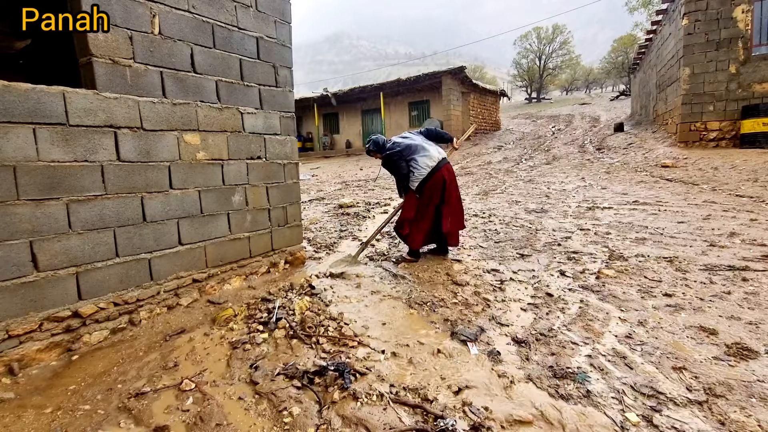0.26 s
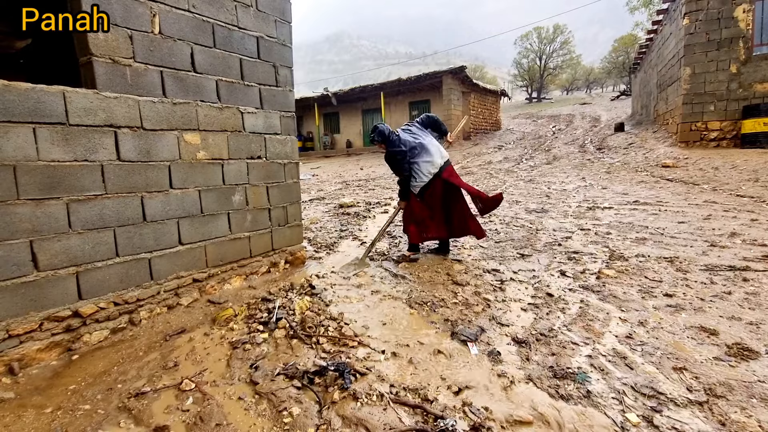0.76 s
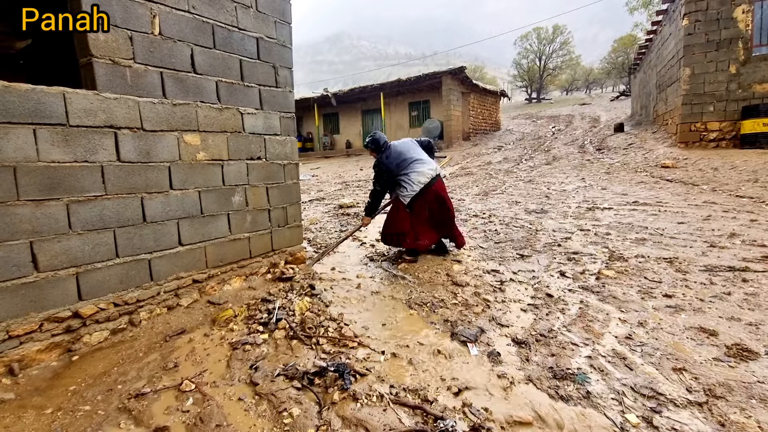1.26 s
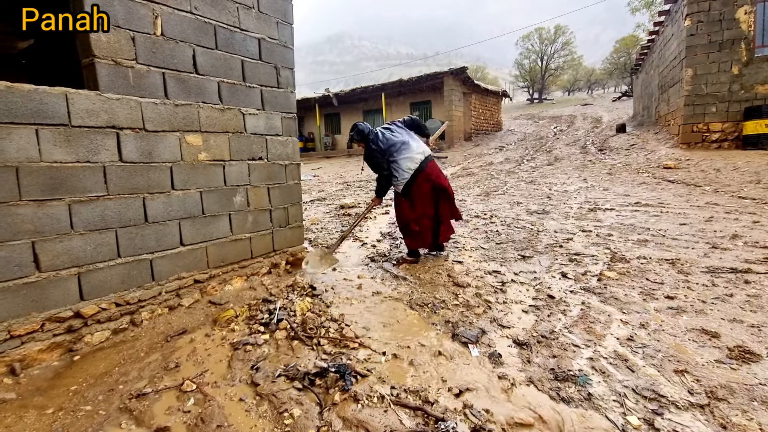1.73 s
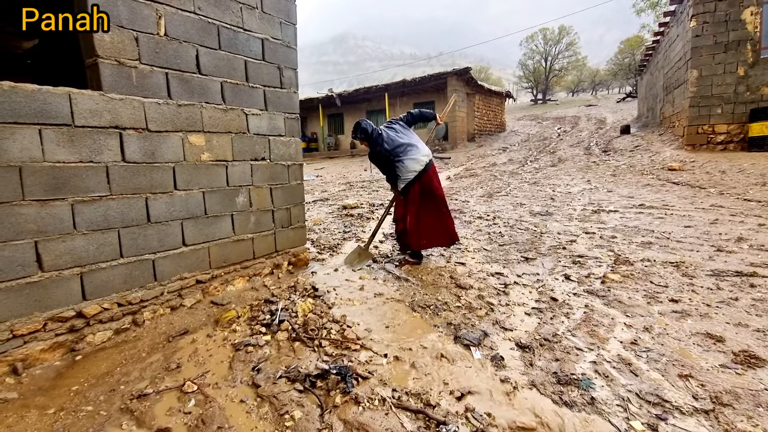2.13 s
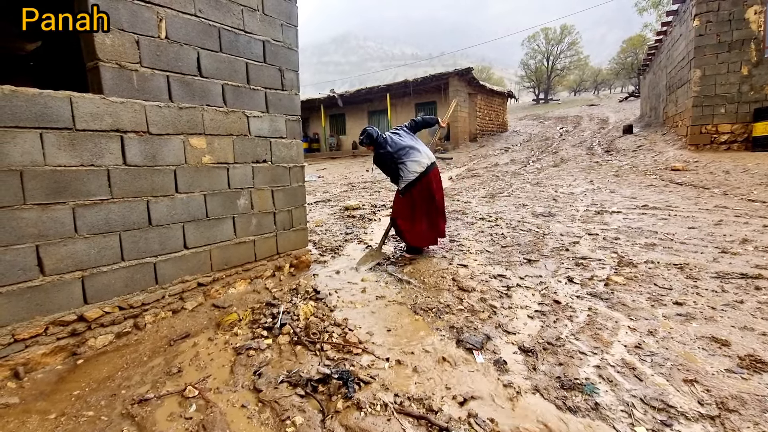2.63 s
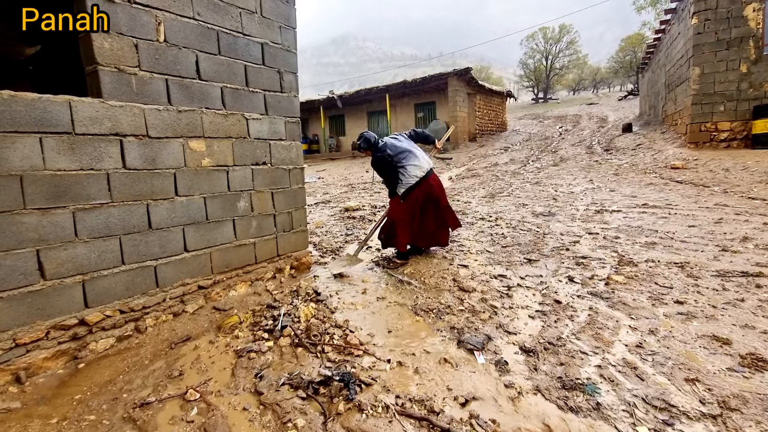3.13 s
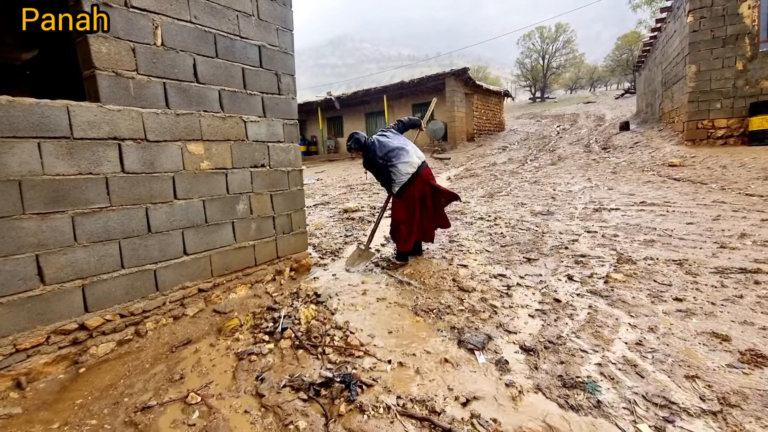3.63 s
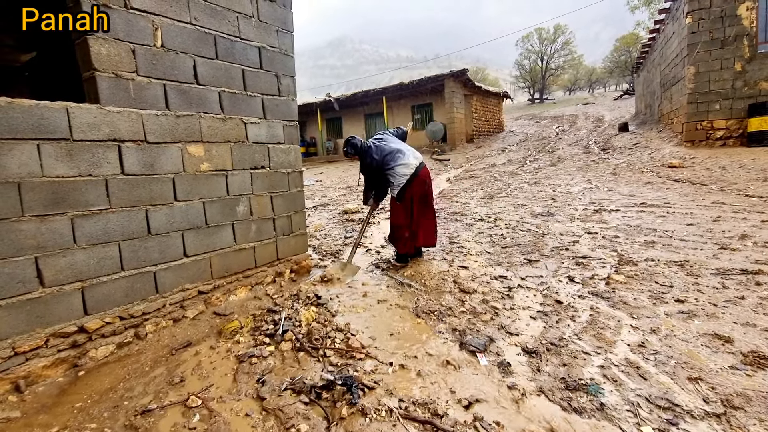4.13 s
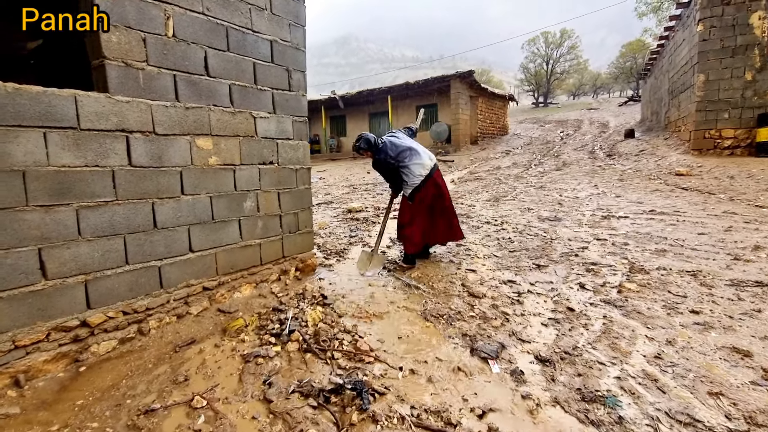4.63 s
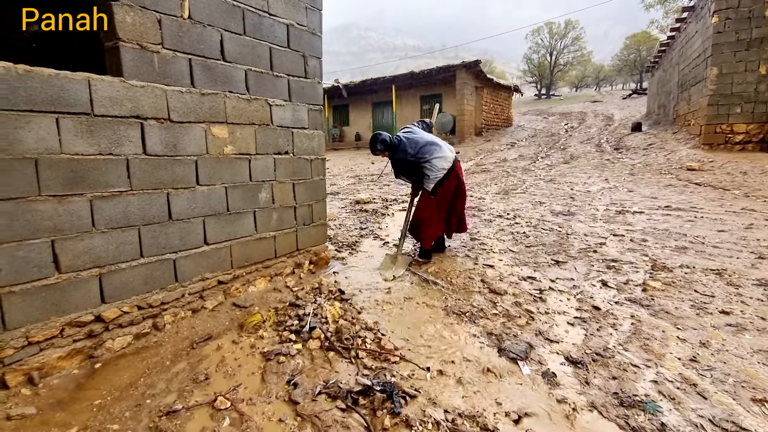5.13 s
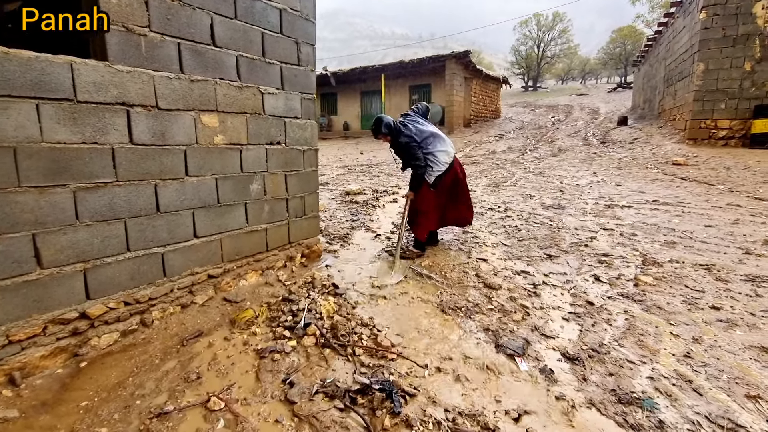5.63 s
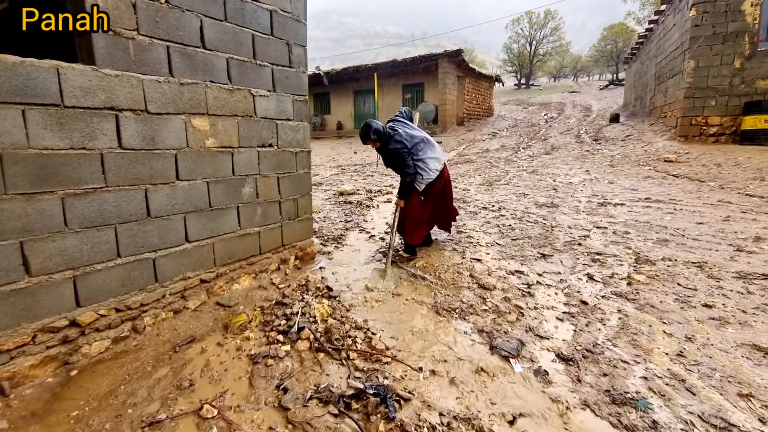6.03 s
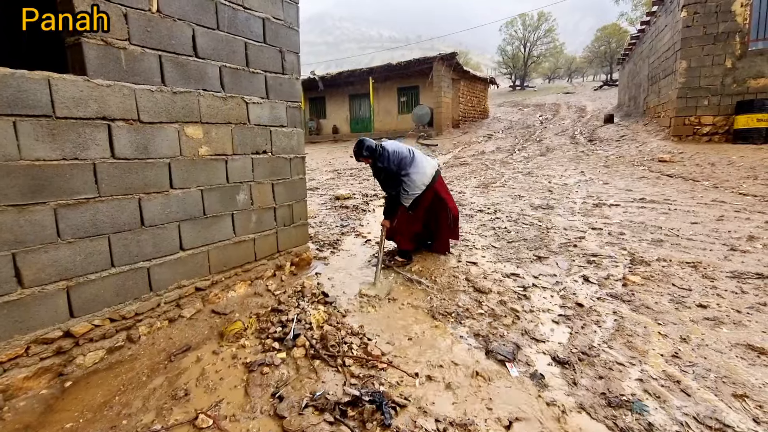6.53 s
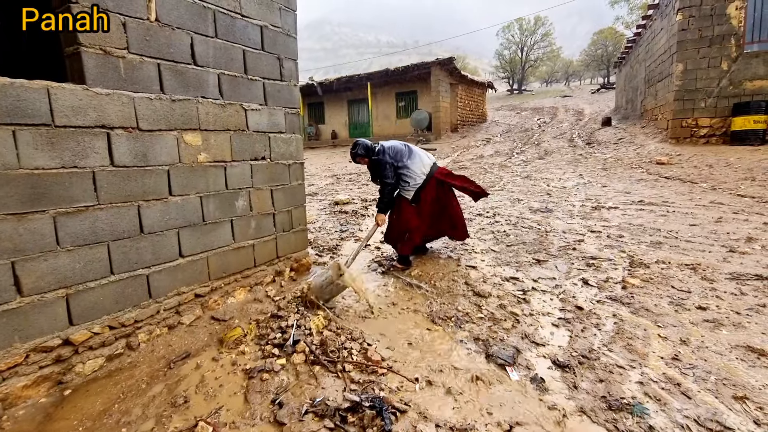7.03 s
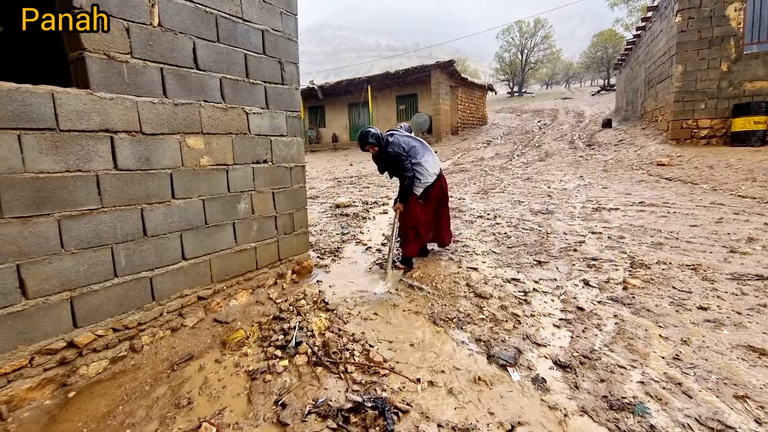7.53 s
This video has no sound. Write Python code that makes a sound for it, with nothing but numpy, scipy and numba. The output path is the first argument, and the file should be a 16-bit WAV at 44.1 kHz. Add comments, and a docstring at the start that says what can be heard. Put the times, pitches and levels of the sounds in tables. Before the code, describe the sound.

Close to a wall in a muddy yard, a shovel slaps, scrapes and pushes wet mud in uneven bursts, bubbly and sucking with a brief steely edge. The thickest churning comes around one second and again near four, with sparser slops between. Thin trickling and drizzle hiss continue beneath, sparrows chirp faintly slightly to the right, and gusts rumble directly on the stereo microphone.

```python
"""Shovelling wet mud beside a wall

A shovel slaps and pushes mud along a ditch: torn noise and bubbles excite steel blade resonances.
Air pockets sing as decaying sines; water is a crowd of small rings over hiss, with single ticking drops.
Sparrows, a little stronger on the right, are gliding near-sine tones; walls and ground add a noise tail.
Gusty wind is low noise with lumpy levels and a few thumps, acting directly on two microphone ports.
"""
import sys
import numpy as np
from scipy import signal
from scipy.fft import rfft, irfft, next_fast_len
from scipy.io import wavfile
from scipy.ndimage import uniform_filter1d, map_coordinates
from numba import njit

SR = 44100
rng = np.random.default_rng(int(sys.argv[2]) if len(sys.argv) > 2 else 0)


def digitize_waveform(pressure):
    """Quantize a signal to 16-bit integers and store it at the path in sys.argv[1].

    Rows of a 2-D input are taken as channels; values are limited to [-1, 1].
    """
    field = np.atleast_2d(pressure).T
    bounded = np.clip(field, -1, 1)
    quanta = np.round(bounded * 32767).astype(np.int16)
    wavfile.write(sys.argv[1], SR, quanta)


N = 342524  # samples
MID_SIDE = np.array([[1], [-1]])  # sign of the side signal at the left and right ports


def undb(db):
    """Decibel law: amplitude gain of a level in dB."""
    return 10 ** (np.asarray(db) / 20)


def unit(x):
    """Normalization: scales a signal to rms 1."""
    return x / np.sqrt(np.mean(x ** 2))


def curve(table):
    """Linear interpolation: columns of a time table, one value a sample."""
    s, *columns = np.transpose(table)
    return [np.interp(np.arange(N) / SR, s, column) for column in columns]


def colour(x, points, lo_hz=1, hi_hz=30000):
    """Linear filtering: weights the spectrum by (f/Hz, gain/dB) points between two soft edges."""
    size = next_fast_len(N)
    f = np.arange(size // 2 + 1) * SR / size + 1e-3
    hz, db = np.transpose(points)
    edges = 1 / np.sqrt((1 + (lo_hz / f) ** 8) * (1 + (f / hi_hz) ** 8))
    gain = undb(np.interp(np.log(f), np.log(np.maximum(hz, 1)), db)) * edges
    return irfft(rfft(x, size) * gain, size)[..., :N]


def walk(rate):
    """Random modulation: levels held 1 / rate s, smoothed twice, with rms 1."""
    k = max(int(SR / rate), 2)
    held = np.repeat(rng.standard_normal(N // k + 1), k)
    return unit(uniform_filter1d(uniform_filter1d(held, k), k)[:N])


def lumpy(points, edges_hz, lumps_db, rate):
    """Band-limited noise: each band fluctuates in level independently."""
    out = 0
    for lo, hi in zip(edges_hz, edges_hz[1:]):
        lumps = undb(lumps_db * walk(rate))
        out = out + lumps * colour(rng.standard_normal(N), points, lo, hi)
    return unit(out)


@njit
def ring(start, hz, turns, size, glide, length):
    """Damped oscillation: grains swell, decay by 1/e in `turns` cycles and rise in pitch."""
    out = np.zeros(length)
    for g in range(len(start)):
        step, fade = 2 * np.pi * hz[g] / SR, np.exp(-hz[g] / (turns[g] * SR))
        phase, a = 0., size[g]
        for i in range(start[g], min(length, start[g] + int(5 * turns[g] * SR / hz[g]))):
            phase += step
            step *= 1 + glide * (1 - fade)
            a *= fade
            out[i] += a * np.sin(phase) * min(phase / (3 * turns[g]), 1.)
    return out


def grains(s, hz, turns, db, glide):
    """Superposition: sums damped oscillations at times s, limited to audible pitches."""
    s, hz, turns, db = np.broadcast_arrays(s, hz, turns, db)
    start = (np.clip(s.ravel(), 0, N / SR) * SR).astype(np.int64)
    pitch = np.clip(hz.ravel(), 30., 15000.)
    return ring(start, pitch, 1. * turns.ravel(), undb(db.ravel()), float(glide), N)


# trickling water and drizzle: t/s, relative gurgle level/dB, relative patter level/dB
FLOW = [(0.0, -43.5, -49), (0.91, -41.5, -50.5), (3.42, -45.5, -50), (4.13, -37.5, -45.5),
        (4.91, -39.5, -47), (7.77, -36.5, -45)]


def trickle(swell_db, count=7000):
    """Bubble resonance: small bubbles and drops ring at random times, as loud as the flow."""
    gurgle_db, patter_db = curve(FLOW)
    where, size, pitch, lasting = rng.random((count, 4)).T
    at = (where * (N - 1)).astype(int)
    hz = 600 * 25 ** pitch
    flow_db = np.where(hz < 3500, gurgle_db[at] - 8, patter_db[at] + 2 - hz / 1100)
    flow_db = flow_db + 2 * swell_db[at]
    # a few grains are much louder than the rest; longer ones are softer
    db = flow_db - 5 * lasting ** 3 - 4.38 * np.log(size + 0.0044)
    return grains(where * N / SR, hz, 1.33 + 11 * lasting ** 3, db, glide=0.082)


def spatter(count=600):
    """Impulse response: each near drop kicks up the drizzle gain, which decays by 1/e in 3 ms."""
    where, size = rng.random(count), np.minimum(rng.exponential(1, count), 3.5)
    kicks = np.zeros(N)
    np.add.at(kicks, (where * N).astype(int), 0.7 * size)
    return 1 + signal.lfilter([1], [1, -np.exp(-1 / (0.003 * SR))], kicks)


# noise spectrum of far water: f/Hz, relative density level/dB
WATER_SPECTRUM = [(290, -13), (500, -4.5), (1040, -2), (1550, -10), (2500, -1.5), (3740, -7), (9370, -22.5),
                  (15500, -21)]


def wash(swell_db):
    """Incoherent sum: far water blurs to patchy hiss, drizzle to steadier hiss nearly unalike at the ports."""
    gurgle_db, patter_db = curve(FLOW)
    water = (463, 820, 1400, 1610, 2300, 3040), gurgle_db - 7.5 + swell_db, .8, 3.5
    drizzle = (4370, 5170, 10500, 20100), patter_db - 4.5 + 20 * np.log10(spatter()), .95, 1.2
    out = 0
    for edges_hz, db, apart, lumps_db in (water, drizzle):
        mid, side = (lumpy(WATER_SPECTRUM, edges_hz, lumps_db, rate=30) for _ in range(2))
        out = out + (mid + apart * side * MID_SIDE) * undb(db)
    return out


# wind on the ports: t/s, relative buffeting level/dB, relative rush level/dB
GUSTS = [(0.0, -31, -34.5), (1.1, -31.5, -32.5), (1.43, -36.5, -36), (2.01, -25, -33), (2.08, -36, -33),
         (3.53, -34, -40.5), (3.96, -31.5, -34), (5.43, -36.5, -39.5), (5.91, -30.5, -35.5),
         (6.36, -33, -34.5), (6.51, -20, -31), (6.53, -34.5, -34.5), (6.77, -28, -32.5), (6.83, -40, -41),
         (7.05, -28.5, -37.5), (7.77, -43, -43.5)]
# wind noise spectrum: f/Hz, relative density level/dB
WIND_SPECTRUM = [(12, -48), (20, -29.5), (75, -6), (120, -13), (289, -12), (645, -19.5), (800, -47),
                 (1760, -120)]


def wind():
    """Turbulent pressure: eddies push both ports partly alike, in lumps of limited size."""
    buffet_db, rush_db = curve(GUSTS)
    out = 0
    for lo_hz, hi_hz, db, lumps_db, rate in ((20, 133.6, buffet_db, 4.9, 26), (153, 473, rush_db, 2.26, 25)):
        mid, side = rng.standard_normal((2, N))
        # the two ports agree more as the pitch rises
        side = colour(side, [(60, -2.5), (130, -3.5), (300, -7), (900, -9)])
        band = unit(colour(mid + side * MID_SIDE, WIND_SPECTRUM, lo_hz, hi_hz))
        port_drift_db = 0.31 * np.array([walk(3.395), walk(8.0)])
        out = out + band * undb(db + lumps_db * np.tanh(walk(rate)) + port_drift_db)
    return out


# chirps: t/s at the top, top f/Hz, first f/Hz, then relative climb, drop and last note level/dB
CHIRP_CALLS = [(0.276, 4630, 4080, -42, -45, -37), (1.756, 4300, 4030, -39, -42, -41.5),
               (3.037, 4440, 3880, -46, -44, -44), (6.414, 4290, 3630, -49, -38.5, -42)]
# last note of every chirp: first, middle and end f/Hz
LAST_NOTE = (3100, 3130, 2760)
# sparrow notes given one by one, some lone and some in zigzag calls:
# t/s, length/s, first f/Hz, last f/Hz, relative level/dB
SINGLE_NOTES = [(.008, 0.032, 3050, 4500, -47), (1.612, 0.041, 4250, 3950, -44.5),
                (2.04, 0.017, 4020, 5570, -49), (2.06, 0.022, 4800, 4280, -44.5),
                (2.086, 0.02, 3500, 4070, -51), (2.377, 0.019, 3500, 4630, -40),
                (2.405, 0.01, 3980, 3800, -33), (2.424, .01, 3920, 2930, -44),
                (2.427, 0.0072, 3040, 4120, -44), (2.436, 0.017, 3870, 3120, -42),
                (2.456, .016, 3350, 2670, -46), (2.659, .022, 4200, 3450, -41),
                (3.627, 0.02, 5270, 4770, -42.5), (3.646, 0.032, 4120, 4930, -49),
                (3.678, 0.025, 3550, 4200, -48), (4.686, 0.03, 4240, 4300, -49),
                (4.714, 0.018, 3780, 3550, -41.5), (5.254, 0.019, 4600, 4450, -48),
                (5.278, 0.0091, 5130, 5100, -44), (5.507, 0.017, 4310, 4490, -39),
                (5.517, 0.03, 3940, 3020, -44), (5.542, .012, 3430, 3900, -46),
                (5.555, 0.024, 3400, 3000, -46), (5.601, .025, 4050, 3500, -45.5),
                (6.182, 0.041, 5250, 4460, -48), (6.215, 0.033, 3200, 3800, -48.5),
                (6.548, .022, 4300, 4220, -46), (7.115, .03, 3080, 3390, -42),
                (7.2, 0.012, 3900, 4300, -41), (7.222, .025, 3950, 3300, -42),
                (7.263, 0.033, 3360, 3250, -49)]
CLIMB_S, DROP_S, LAST_AFTER_S, LAST_S = .027, .026, 0.042, 0.034
BREAK_RATIO, DROP_RATIO = .93, .8  # pitch over the top pitch where the drop starts and ends
DROP_SAG = 0.46  # share of the drop done by half time
SECOND_VOICE_RATIO, SECOND_VOICE_DB = 1.13, -14


def sparrows():
    """Frequency modulation: chirps climb, drop and add a low arch; other notes are short single glides."""
    out = np.zeros(N)
    flutter, waver = undb(6 * np.tanh(walk(120))), 1 + .017 * walk(230)  # level and pitch gains
    notes = [(s, length, (first, (first + last) / 2, last), db) for s, length, first, last, db in SINGLE_NOTES]
    for s, top, first, climb_db, drop_db, last_db in CHIRP_CALLS:
        broken, low = top * BREAK_RATIO, top * DROP_RATIO
        climb = first, (first + 2 * top) / 3, top
        drop = broken, broken - DROP_SAG * (broken - low), low
        notes += [(s - CLIMB_S, CLIMB_S, climb, climb_db),
                  (s, DROP_S, drop, drop_db),
                  (s + LAST_AFTER_S, LAST_S, LAST_NOTE, last_db)]
    for start, length, pitches, db in notes:
        a, u = int(start * SR), np.arange(0, 1, 1 / (length * SR))
        # a parabola runs through the three pitches
        hz = np.polyval(np.polyfit((0, .5, 1), pitches, 2), u) * waver[a:a + len(u)]
        phase = 2 * np.pi * np.cumsum(hz) / SR
        voices = np.sin(phase) + undb(SECOND_VOICE_DB) * np.sin(SECOND_VOICE_RATIO * phase)
        out[a:a + len(u)] += np.sqrt(2) * undb(db) * np.sin(np.pi * u) ** 0.075 * voices
    return out * flutter


# blade strokes through mud: t/s at full force, swell/s, hold/s, relative squelch and spray level/dB
BLADE_STROKES = [(0.205, 0.038, 0.023, -29.5, -56), (0.459, 0.026, 0.15, -34, -49),
                 (0.851, 0.12, 0.0045, -16.5, -38.5), (0.956, 0.042, 0.17, -19, -42.5),
                 (1.102, .02, 0.049, -32, -43), (1.168, 0.046, 0.0067, -15, -34),
                 (1.238, .02, 0.091, -29.5, -45.5), (1.516, 0.02, 0.037, -32, -44),
                 (1.659, 0.21, 0.048, -32.5, -43.5), (2.092, 0.011, 0.037, -28.5, -49),
                 (2.744, 0.0083, 0.0045, -10.5, -35), (3.022, 0.047, 0.058, -35.5, -58),
                 (3.481, 0.043, .003, -34, -39.5), (3.846, 0.017, 0.01, -21, -40.5),
                 (3.885, 0.014, 0.041, -16, -37), (4.066, 0.13, 0.058, -21, -50),
                 (4.181, 0.0086, 0.066, -22, -51), (4.336, .015, 0.21, -32, -52),
                 (4.794, 0.043, 0.056, -27.5, -46), (5.351, 0.03, 0.0066, -22, -31),
                 (6.952, 0.036, 0.012, -47, -36), (7.064, .02, 0.17, -33.5, -43.5),
                 (7.7, 0.031, 0.063, -33, -58)]
SWELL_DB = 28.5  # a stroke starts this far under its full force
SQUELCH_FADE_DB_S, SPRAY_FADE_DB_S = 285, 462


def churn():
    """Envelope law: squelch and spray levels in dB swell, hold and fade with each stroke."""
    t = np.arange(0, N / SR, .001)
    out = np.full((2, len(t)), -90.)  # very low between strokes
    for s, swell, hold, squelch_db, spray_db in BLADE_STROKES:
        swell = max(swell, .003)
        rise_db = np.where(t > s - swell, SWELL_DB * np.minimum((t - s) / swell, 0), -np.inf)
        after = np.maximum(t - s - hold, 0)
        out = np.maximum(out, [squelch_db + rise_db - SQUELCH_FADE_DB_S * after,
                               spray_db + rise_db - SPRAY_FADE_DB_S * after])
    return [np.interp(np.arange(N) / SR, t, db) for db in uniform_filter1d(out, size=4, axis=1)]


# mud slaps: t/s, relative slap level/dB, air pocket f/Hz, relative spray level/dB
MUD_SLAPS = [(0.23, -18, 1330, -59), (0.248, -13.5, 1210, -50), (0.428, -21.5, 2030, -37.5),
             (0.512, -21, 2400, -45), (0.526, -12.5, 1140, -45), (0.573, -21, 1046, -42),
             (0.799, -19, 1300, -58), (0.859, -8.5, 790, -54), (0.967, -2.5, 2100, -27.5),
             (0.986, -4.5, 1163, -32), (1.008, -7, 478, -50), (1.028, -9, 459, -50),
             (1.043, -11, 2380, -33.5), (1.058, -6.5, 518, -37), (1.118, -13, 994, -50),
             (1.176, -7.5, 896, -29), (1.212, -19, 473, -45), (1.322, -17.5, 496, -36),
             (1.431, -21.5, 1077, -35), (1.489, -23, 1245, -42), (1.545, -18.5, 3660, -40),
             (1.617, -29, 755, -52), (1.671, -19.5, 1255, -52), (1.709, -15, 2600, -36.5),
             (1.727, -18.5, 990, -45), (1.784, -21.5, 1885, -58), (2.1, -23, 1270, -53),
             (2.131, -19, 1270, -57), (2.146, -20, 2370, -42), (2.405, -24, 1980, -45),
             (2.68, -15.5, 1860, -41), (2.743, -13, 654, -26.5), (2.764, -5, 630, -29),
             (2.779, -11, 800, -57), (2.982, -24, 910, -56), (3.025, -3, 1606, -38),
             (3.044, -14, 1233, -44), (3.063, -9.5, 1714, -43), (3.773, -9.5, 860, -40.5),
             (3.857, -14, 875, -42), (3.9, -15, 1080, -37), (3.912, -11, 1185, -54),
             (3.952, -11.5, 810, -51), (4.028, -16, 1264, -42), (4.075, -8.5, 892, -39),
             (4.099, -4.5, 1383, -42), (4.179, -9.5, 915, -39), (4.205, -16, 1190, -58),
             (4.225, -8.5, 1945, -46), (4.24, -11.5, 1100, -26.5), (4.411, -12.5, 3230, -37),
             (4.79, -19, 1960, -38), (4.8, -13, 3050, -55), (4.893, -5.5, 2220, -35),
             (4.917, -16, 1276, -49), (5.335, -9, 1055, -47), (5.364, -14, 1495, -43),
             (6.373, -20, 1970, -54), (6.385, -34, 1260, -51), (6.417, -20, 1090, -41),
             (6.597, -18.5, 2870, -37.5), (6.612, -17.5, 2060, -51), (6.619, -23.5, 1050, -56),
             (6.705, -19, 1114, -56), (6.778, -24, 2220, -48), (6.791, -19.5, 1500, -49),
             (6.942, -22, 2490, -53), (7.085, -20, 2240, -37), (7.256, -22.5, 1250, -46),
             (7.704, -7, 844, -29), (7.735, -14.5, 1900, -52)]
# noise spectrum of torn mud: f/Hz, relative density level/dB
MUD_SPECTRUM = [(260, -13), (450, 9.5), (562, -9.5), (1230, 5), (2910, 0), (6370, -15), (7610, -12),
                (9090, -24), (15500, -25.5)]


def slop(crowd=9000):
    """Noise excitation: mud tears along strokes and at slaps, among a dense crowd of bubbles."""
    squelch_db, spray_db = churn()
    s, db, _, drops_db = np.transpose(MUD_SLAPS)
    t = np.arange(int(.1 * SR)) / SR
    blows, drops = np.zeros((2, N + len(t)))
    np.add.at(blows, ((s - .001) * SR).astype(int), undb(db))
    np.add.at(drops, (s * SR).astype(int), undb(drops_db))
    # a slap swells for a few ms, dies fast and leaves a wet tail
    burst = t / 0.0046 * np.exp(1 - t / 0.003)
    wet_tail = 0.19 * np.tanh(t / .004) * np.exp(-t / 0.0053)
    slap = signal.fftconvolve(blows, burst + wet_tail)[:N]
    crack = signal.fftconvolve(drops, (1 - np.exp(-t / .003)) * np.exp(-t / .007))[:N]
    squelch = lumpy(MUD_SPECTRUM, (450, 800, 1300, 2000, 2900, 4000), lumps_db=5, rate=120)
    spray = lumpy(MUD_SPECTRUM, (3670, 5800, 8600, 20000), lumps_db=2.5, rate=140)
    # the blade grips and slips over grit, so the churning comes in clumps with gaps
    clumps_db = 3.8 * walk(200)
    torn = (undb(-16.5) * slap + undb(squelch_db + clumps_db - 13.0)) * squelch
    torn += (undb(7.5) * crack + undb(spray_db + clumps_db)) * spray
    # bubbles follow the blade and get louder in each slap
    busy_db = 20 * np.log10(undb(squelch_db + clumps_db - 21.0) + undb(-27.5) * np.abs(slap))
    where, size = rng.random(crowd), np.minimum(rng.exponential(1, crowd), 4)
    pitch = rng.uniform(-0.92, 1, crowd)
    bubbles_db = busy_db[(where * (N - 1)).astype(int)] + 3.47 * size - 1.2 * pitch
    return torn + grains(where * N / SR, 1400 * np.exp(1.05 * pitch), 7.43, bubbles_db, glide=0.019)


# steel blade modes: f/Hz, gain level/dB
BLADE_MODES = [(905, -0.5), (1235, -1.5), (2160, -2.5), (3040, -0.5), (3850, 0.5), (4540, 0)]
BLADE_WIDTH_HZ = 40  # bandwidth of each mode


def blade(x):
    """Modal resonance: mud tearing along the blade sets its steel modes ringing briefly."""
    return sum(undb(db) * signal.lfilter(*signal.iirpeak(hz, hz / BLADE_WIDTH_HZ, SR), x)
               for hz, db in BLADE_MODES)


def pockets(count=6):
    """Cavity resonance: each slap's largest air pocket sings and a few others follow it."""
    s, db, hz, _ = np.transpose(MUD_SLAPS)
    largest = grains(s - .001, hz, 7 + hz * 0.0019, db - 8, glide=0.0254)
    late, higher, softer = np.moveaxis(rng.random((len(s), count, 3)), 2, 0)
    others_s = s[:, None] + .022 * late
    others_hz = np.minimum(hz[:, None] * 2 ** (1.6 * higher - 0.3), 3800)
    others_db = db[:, None] - 13.0 - 8 * softer
    return largest + grains(others_s, others_hz, 4.6, others_db, glide=0.021)


# single drops on stone and water: t/s, relative level/dB, lowest partial f/Hz
DROP_TICKS = [(0.3482, -22.5, 4340), (0.444, -24.5, 4960), (4.5375, -23, 6670), (4.566, -25, 3300),
              (4.7596, -19, 6600), (4.969, -28.5, 3500), (6.683, -33, 4300), (6.7556, -27, 5170),
              (7.0648, -19, 5540)]


def ticks():
    """Impact response: each drop rings three short partials at once."""
    s, db, hz = np.transpose(DROP_TICKS)
    out = grains(s, hz, 6., db + 2.5, glide=0)
    out = out + grains(s, 1.6 * hz, 3., db, glide=0)
    return out + grains(s, 13000.0, 2.5, db - 2, glide=0)


# strong eddies: t/s, relative level/dB, starting f/Hz
EDDY_THUMPS = [(6.497, -5, 72), (5.9, -9.5, 79), (2.652, -13, 59)]


def thumps():
    """Heavily damped oscillation: a strong eddy thumps the membrane once."""
    s, db, hz = np.transpose(EDDY_THUMPS)
    return grains(s - .5 / hz, hz, 0.56, db - 0.5, glide=0.267)


def yard(x, wall_db, wall_ms):
    """Diffuse reverberation: walls and ground add a short decaying tail, different at each port."""
    t = np.arange(int(.25 * SR)) / SR
    tail = rng.standard_normal((2, len(t))) * np.exp(-1000 * t / wall_ms) * (t > .006)
    tail = tail / np.sqrt(np.sum(tail ** 2, axis=1, keepdims=True))
    return x + undb(wall_db) * signal.fftconvolve(x, tail, axes=1)[:, :N]


# likeness of mud and trickle at the two ports, before pockets and echo: f/Hz, correlation
PORT_LIKENESS = [(600, .95), (1700, .75), (3400, .66), (4800, .12)]
LEFT_LEADS_US = 54  # mud reaches the left port earlier by this


def scene():
    """Superposition: shovel, water and birds share the yard; wind acts on the ports directly."""
    swell_db = 1.22 * walk(40)
    left, other = (x + blade(x) + trickle(swell_db) for x in (slop(), slop()))
    # splashes cover a wide patch: their treble reaches the two ports unalike
    right = colour(left, [(hz, 20 * np.log10(c)) for hz, c in PORT_LIKENESS])
    right = right + colour(other, [(hz, 10 * np.log10(1 - c ** 2)) for hz, c in PORT_LIKENESS])
    mud = yard(np.array([left, right]) + pockets() + ticks(), wall_db=-15.0, wall_ms=54)
    mud[0] = map_coordinates(mud[0], [np.arange(N) + LEFT_LEADS_US * SR / 10 ** 6], mode="mirror")
    birds = yard(sparrows()[None], wall_db=-6, wall_ms=28) * undb([[-.7], [.7]])
    return mud + birds + wash(swell_db) + wind() + thumps()


# spectral balance of the ports: f/Hz, left minus right level/dB
PORT_DIFFERENCE = [(60, -2), (250, 0.3), (1300, 0.5), (4400, -3.5), (8000, -1.5), (15000, -0.6)]
TOP_HZ = 15900


def record(dry):
    """Transducer response: the two ports differ in colour and the top is cut steeply."""
    ports = [colour(dry[k], [(hz, (.5 - k) * db) for hz, db in PORT_DIFFERENCE]) for k in range(2)]
    low_pass = signal.ellip(10, .2, 80, TOP_HZ, fs=SR, output="sos")
    return signal.sosfilt(low_pass, np.array(ports))


dry = scene()
out = record(dry)
digitize_waveform(out)
```